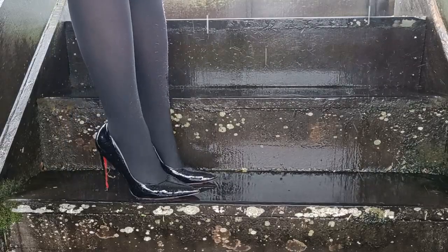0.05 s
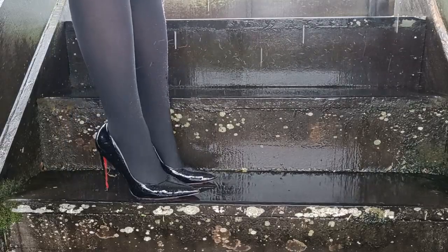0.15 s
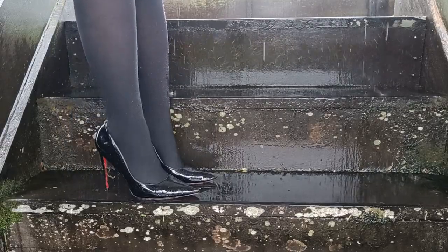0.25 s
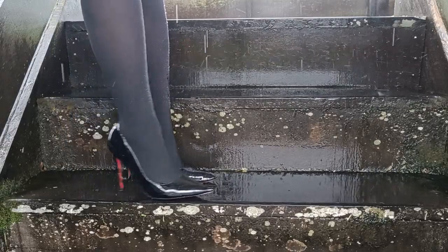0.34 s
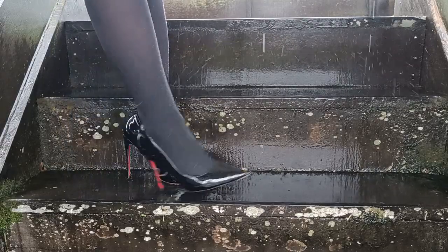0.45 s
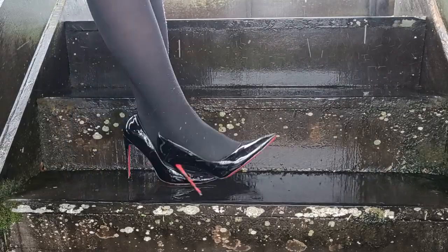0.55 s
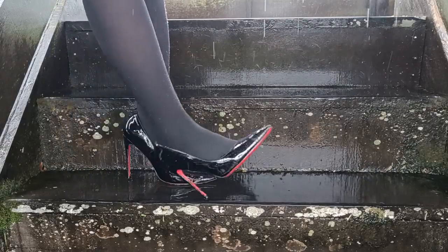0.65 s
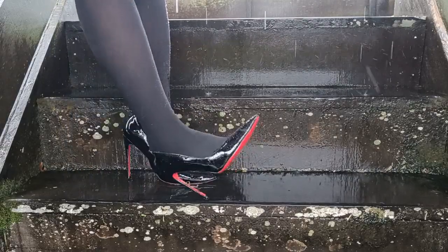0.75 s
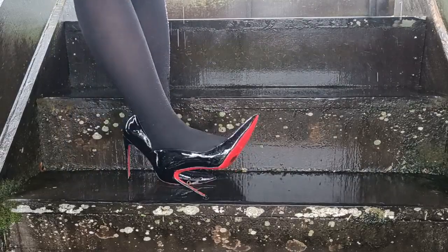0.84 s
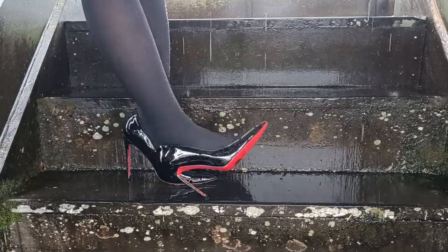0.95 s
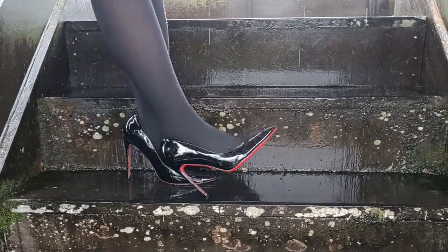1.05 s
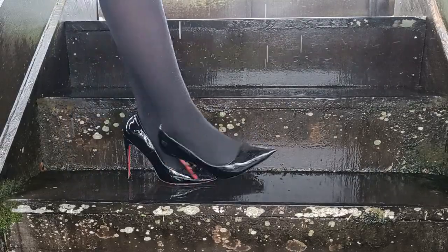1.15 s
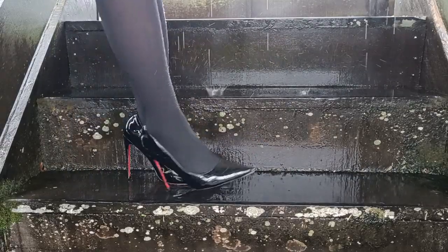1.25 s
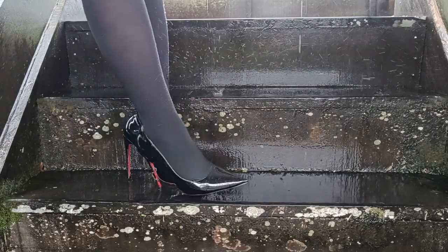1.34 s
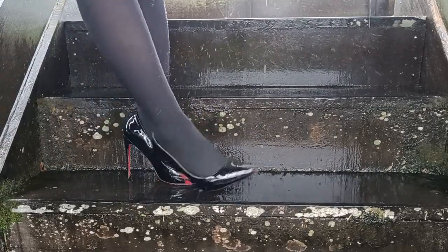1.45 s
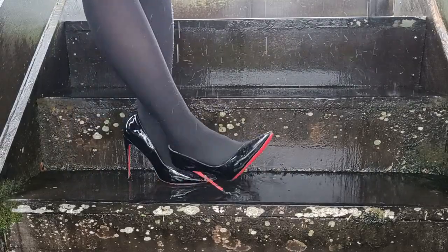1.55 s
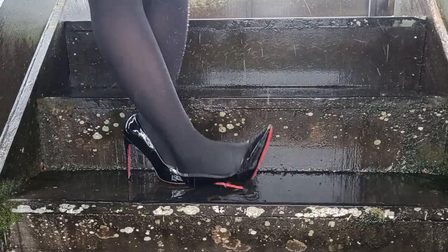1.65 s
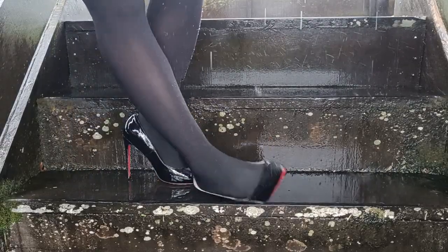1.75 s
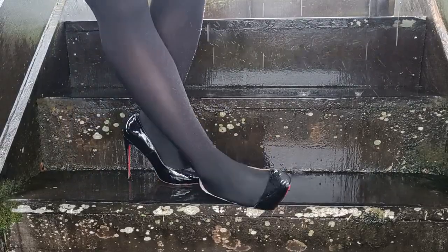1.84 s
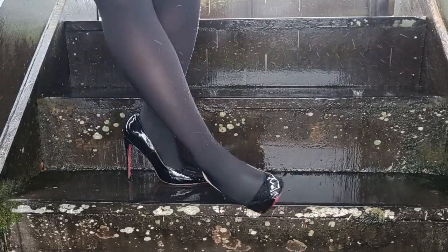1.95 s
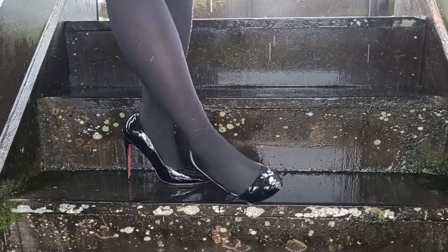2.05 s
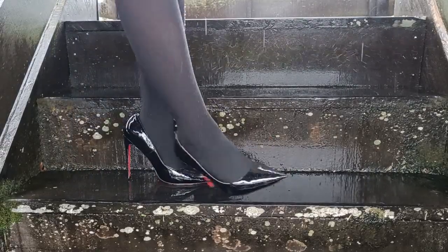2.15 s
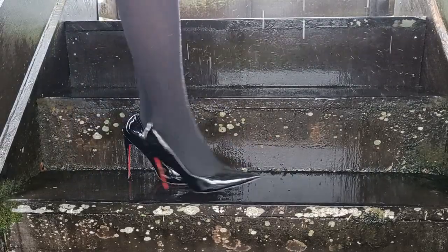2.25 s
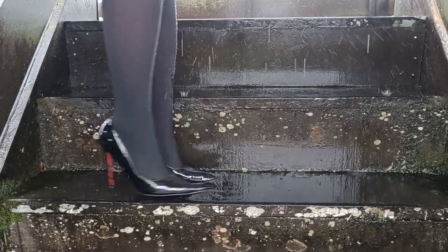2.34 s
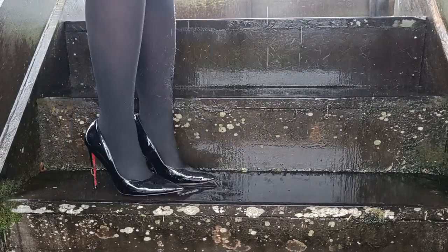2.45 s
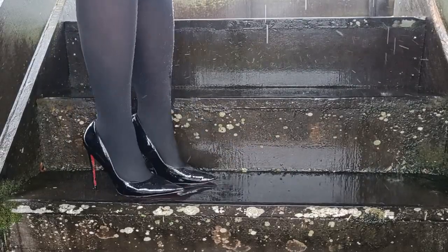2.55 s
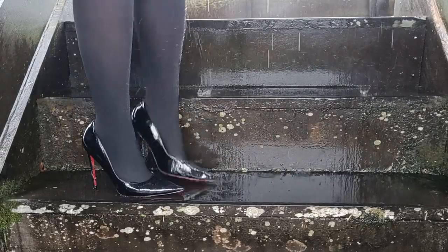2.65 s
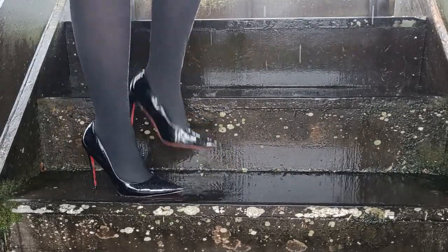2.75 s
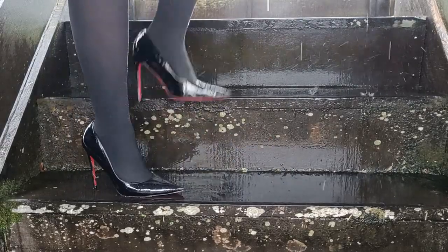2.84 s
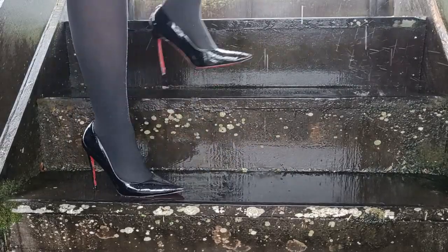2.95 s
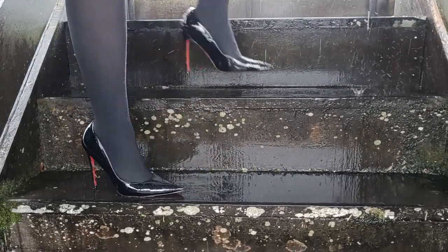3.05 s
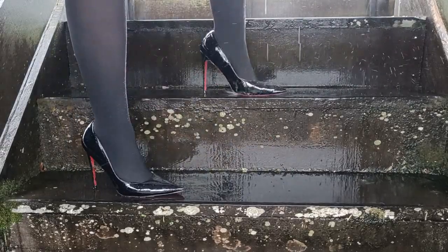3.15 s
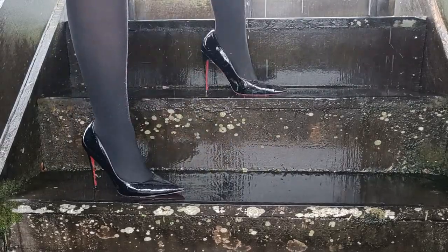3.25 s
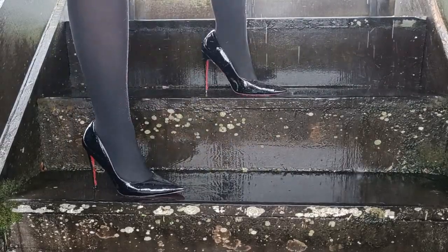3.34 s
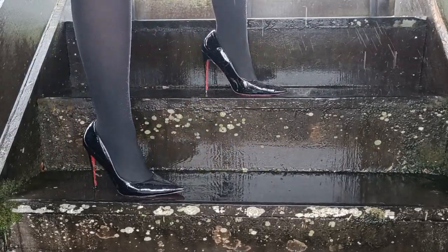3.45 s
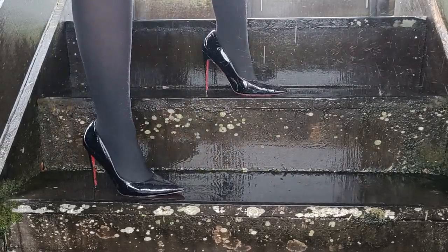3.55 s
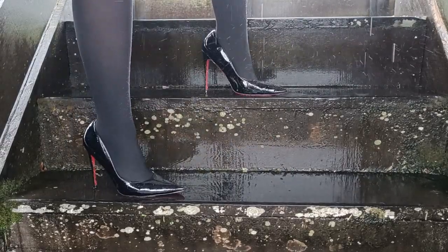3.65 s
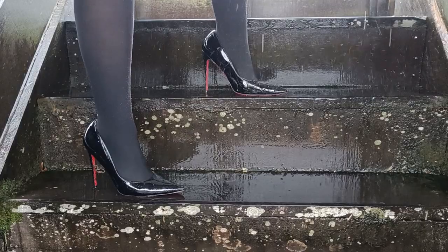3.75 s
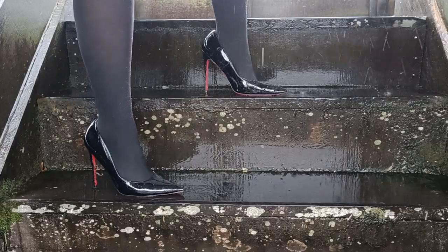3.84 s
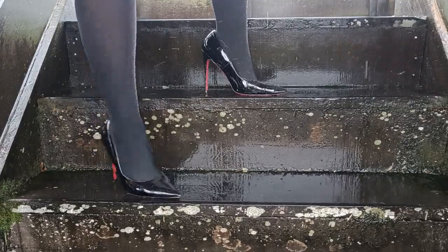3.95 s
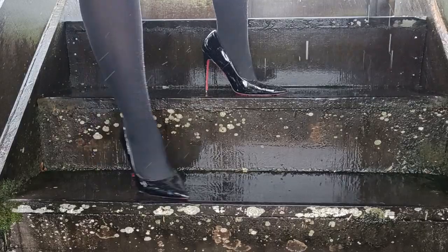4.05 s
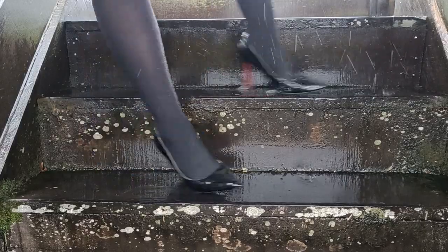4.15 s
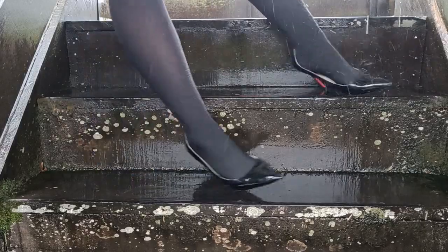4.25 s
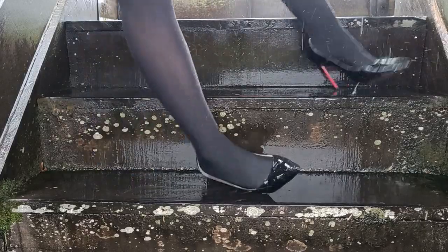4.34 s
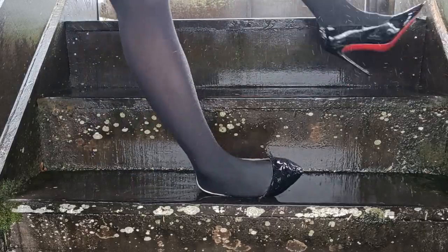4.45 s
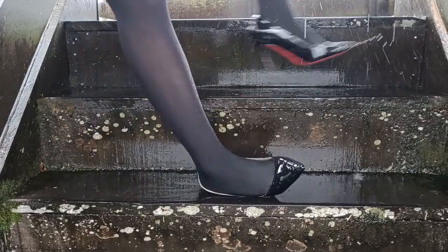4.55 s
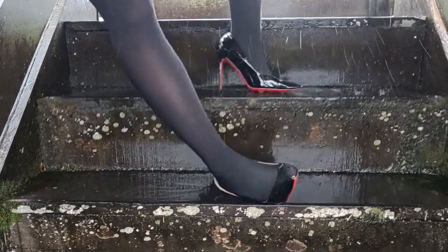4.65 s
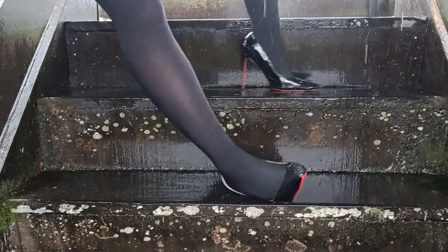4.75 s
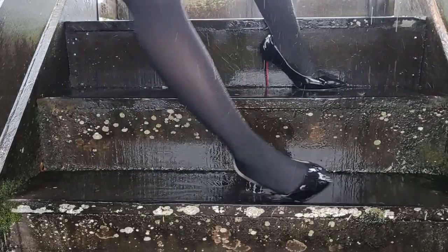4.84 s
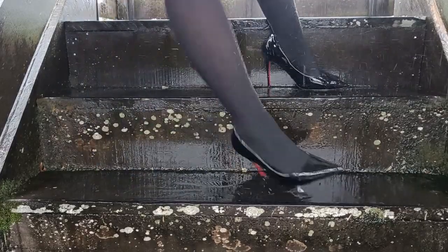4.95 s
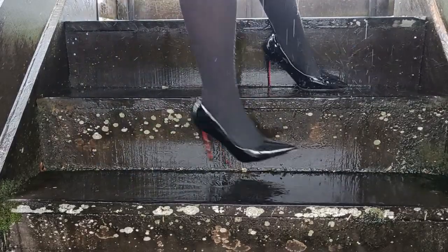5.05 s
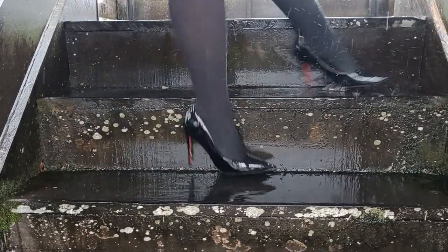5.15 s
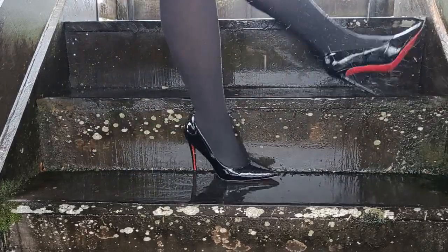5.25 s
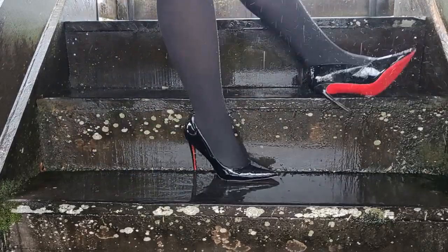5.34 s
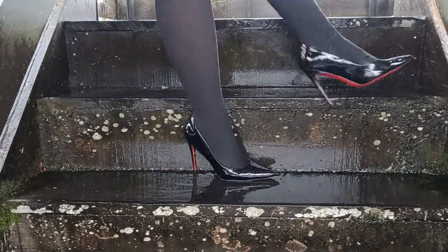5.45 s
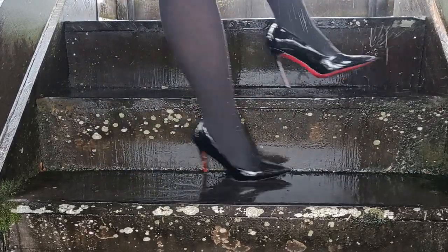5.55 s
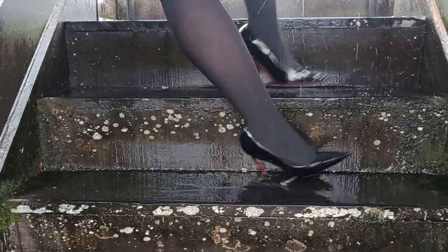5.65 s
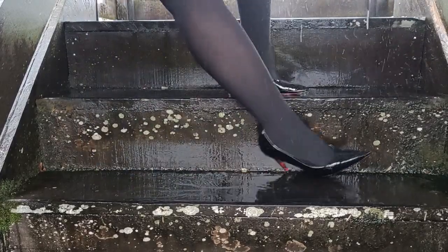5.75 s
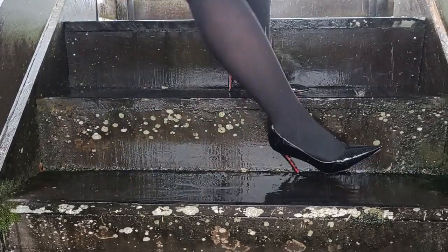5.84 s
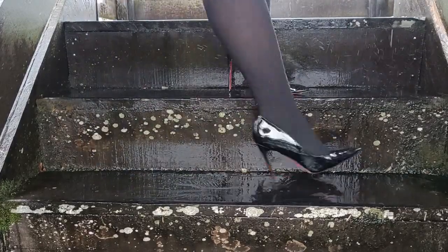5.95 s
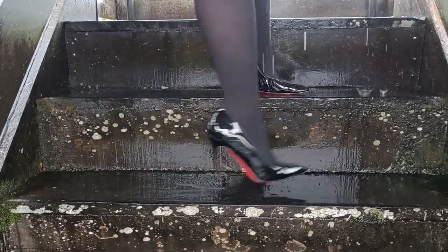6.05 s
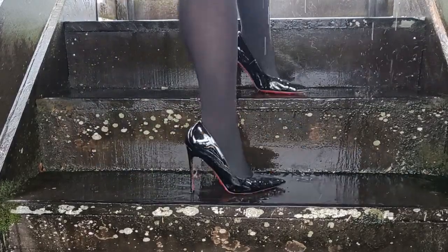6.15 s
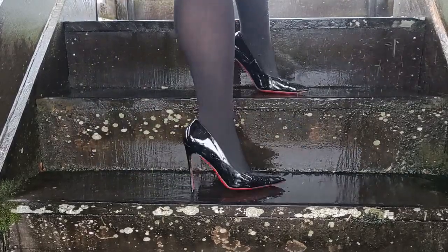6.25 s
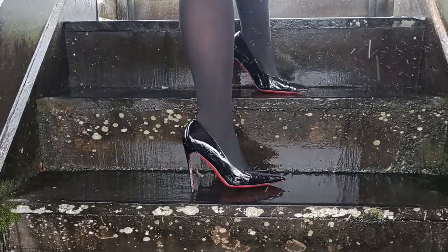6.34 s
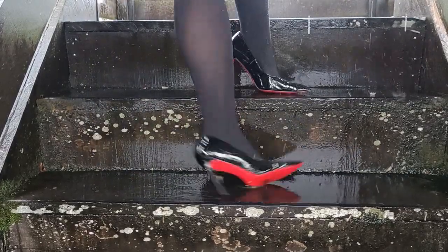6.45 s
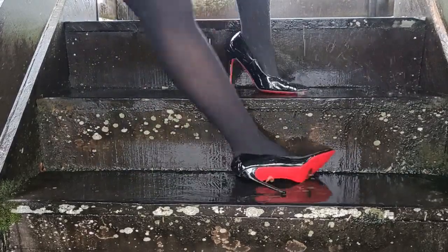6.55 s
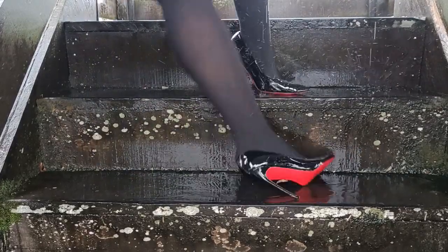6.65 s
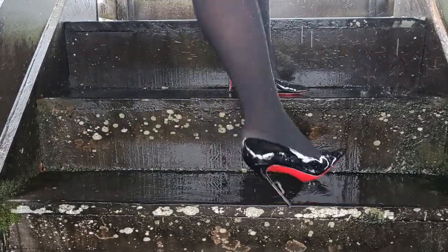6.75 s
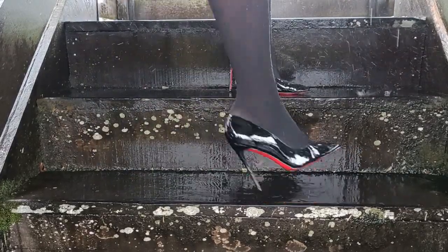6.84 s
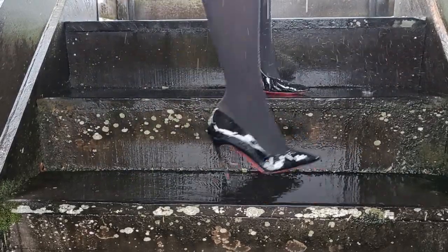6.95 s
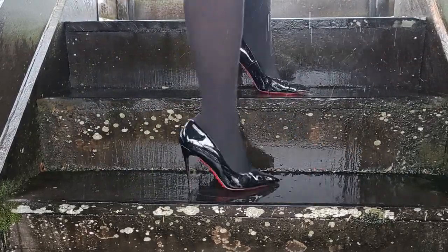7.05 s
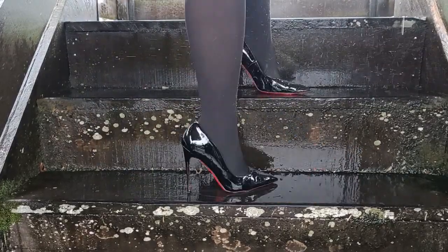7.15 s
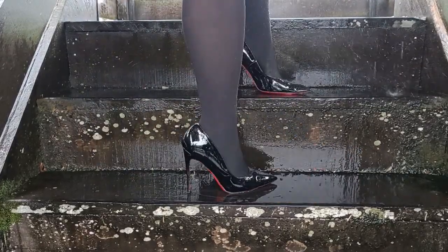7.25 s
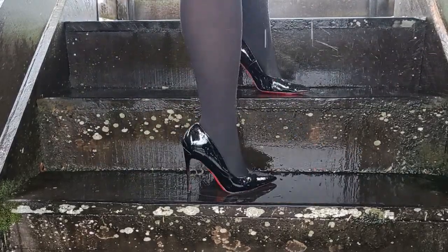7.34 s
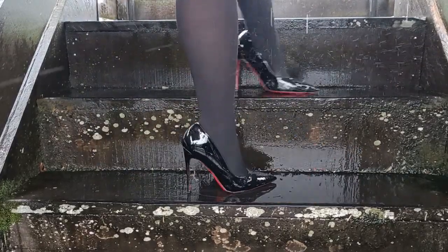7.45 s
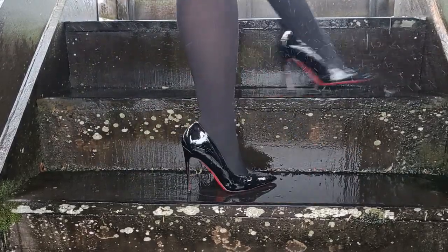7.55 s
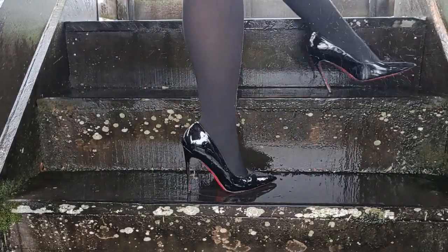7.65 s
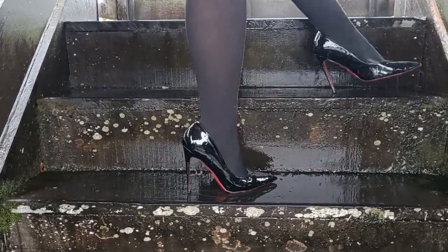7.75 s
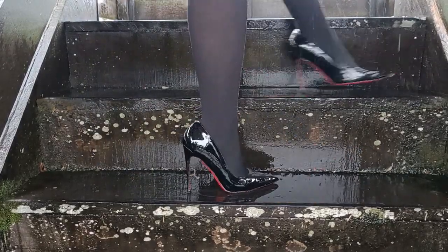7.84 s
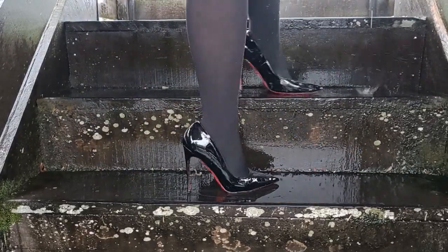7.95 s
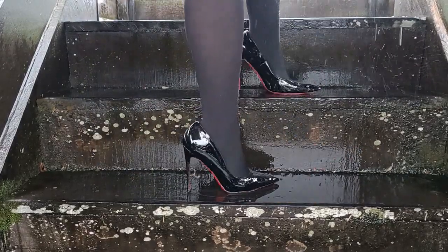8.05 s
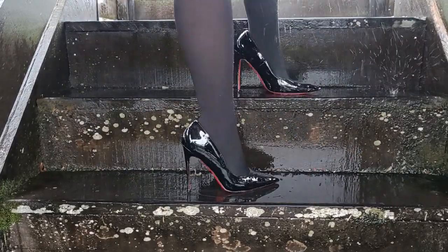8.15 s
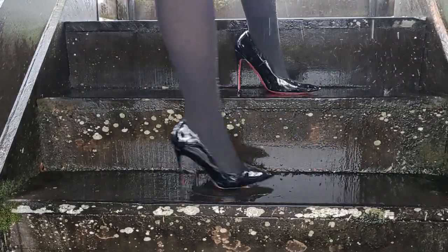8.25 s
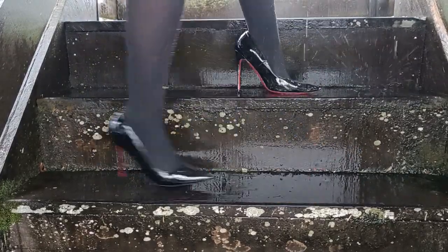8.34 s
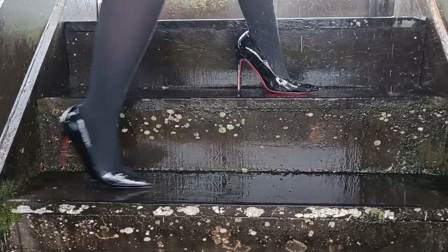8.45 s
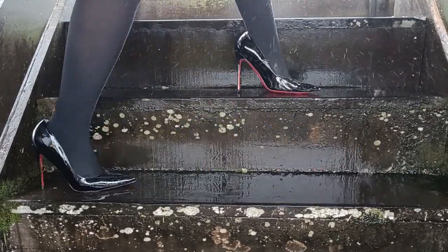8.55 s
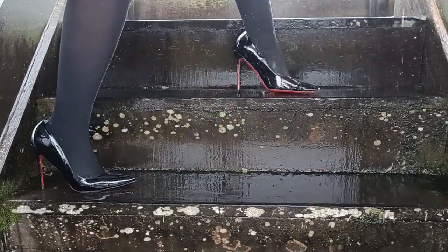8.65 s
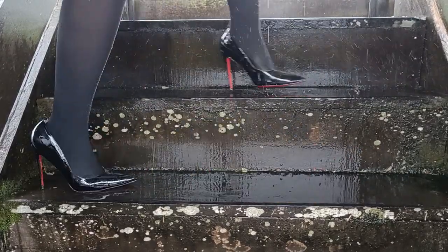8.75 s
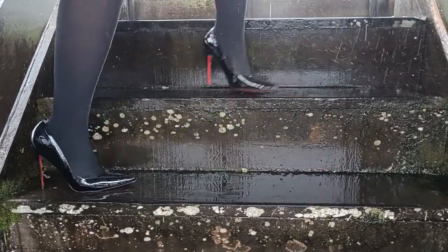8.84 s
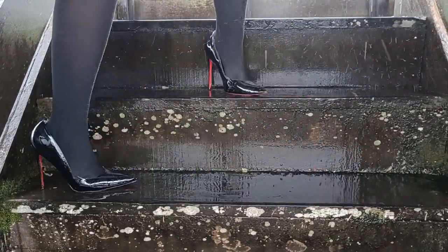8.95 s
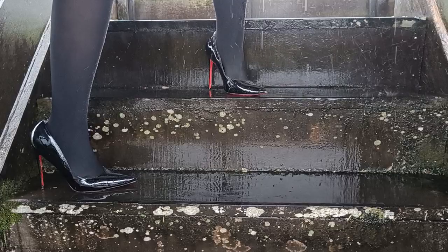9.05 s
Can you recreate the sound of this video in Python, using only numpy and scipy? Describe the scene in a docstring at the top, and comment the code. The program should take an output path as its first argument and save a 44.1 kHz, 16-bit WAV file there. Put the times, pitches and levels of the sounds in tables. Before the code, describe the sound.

Steady light rain outdoors while high heels step about on hollow wooden stairs, clacking, scuffing and slapping the wet surface.

```python
"""Stiletto heels step about on wet outdoor wooden steps in steady rain.
Each heel knocks on a step and sets the whole staircase ringing, while the sole slaps the film of water.
Between steps the shoes rock with soft bumps or scrape over grit. Far raindrops blur into a hiss
and close ones plink. The left microphone opening is muffled; the right one lets the treble in."""
import sys
import numpy as np
from scipy import signal
from scipy.fft import rfft, irfft
from scipy.io import wavfile
from scipy.ndimage import uniform_filter1d, minimum_filter1d

SR = 44100
rng = np.random.default_rng(int(sys.argv[2]) if len(sys.argv) > 2 else 0)


def inscribe(sig):
    """Save sig as 16-bit PCM at rate SR to the path in sys.argv[1].

    A 1-D sig is mono; a 2-D sig holds one channel per row.
    Samples are clipped to [-1, 1] before scaling.
    """
    pcm = np.round(np.clip(np.atleast_2d(sig).T, -1, 1) * 32767)
    wavfile.write(sys.argv[1], SR, pcm.astype(np.int16))


N = 401310
TAIL = np.arange(SR * 3 // 5) / SR  # seconds since a hit

# tone of the rain all around: f/Hz, relative level/dB
RAIN_SPECTRUM = [(25, -10.5), (100, -5.5), (260, -7), (380, -3), (480, 0), (620, -6), (1080, -6.5),
                 (1340, -2.5), (2000, -8), (2800, -17.5), (5000, -19.5), (6700, -21.5), (12000, -21.5),
                 (15500, -30.5)]
# how alike the rain is in both ears: f/Hz, likeness (1 = the same)
RAIN_LIKENESS = [(60, 0.87), (130, 0.89), (290, 0.9), (640, 0.32), (1400, 0), (16000, 0)]
# drops landing close by: t/s, level/dB, f/Hz
CLOSE_DROPS = [(.567, -31, 8650), (1.14, -30, 12500), (1.42, -11.5, 6000), (2.775, -31, 8650),
               (4.113, -25.5, 6100), (7.0, -14, 5600), (8.536, -18, 11800)]
# a standing shoe rocks and bumps the step: t/s, level/dB, brightness/dB
BUMPS = [(1.4, -53, -10), (1.548, -47.5, -6.5), (1.838, -49, -6.5), (4.41, -45.5, -4.5), (5.014, -36.5, -3),
         (5.253, -39.5, 3.5), (5.264, -48, -22.5), (5.452, -44, -1.5), (5.479, -35, -12),
         (5.677, -40.5, 0.5), (6.624, -31, 3.5), (6.828, -45, -2.5), (7.574, -46.5, -10.5),
         (7.749, -49.5, -5)]
# brighter bumps wake higher notes: brightness/dB, wood note f/Hz, clack top f/Hz
BUMP_TONES = [(-13.5, 175, 910), (-2, 201, 2000), (-1, 350, 2000)]
# the brief notes (modes) of heel and shoe: f/Hz, relative level/dB, time to fade 60 dB/s
SHOE_NOTES = [(200, -22.5, 0.06), (341, -3, 0.018), (533, 4, 0.012), (885, 0, 0.0082), (1400, -2, 0.0069),
              (2035, -1.5, 0.0068)]
# the notes of the staircase: f/Hz, relative level/dB, time to fade 60 dB/s
STAIR_NOTES = [(41.2, -13.5, 0.96), (88.2, -5, 0.64), (105.6, -7, 0.095), (122.7, -3, 0.38),
               (158.4, -16, 0.45), (173, -14.5, 0.41), (214.2, -7.5, 0.2), (302.7, -2.5, 0.23),
               (366, 2, 0.19), (396.5, -9.5, 0.23), (458.8, -1.5, 0.13), (492.6, 1.5, 0.23),
               (645, -14, 0.18), (714, -7.5, 0.33), (751, -11.5, 0.23), (1032.5, -5.5, 0.11),
               (1228, -6.5, 0.081), (2190, -23, 0.22)]
# its blur of crowded notes and nearby echoes: f/Hz, relative level/dB
RING_SPECTRUM = [(30, -18), (60, -6.5), (130, 8), (255, 1), (320, 2), (500, 7), (800, -4), (1300, -6.5),
                 (1900, -13.5), (2700, -22), (5000, -57)]
# how long that blur lasts: f/Hz, time to fade 60 dB/s
RING_FADES = [(40, 0.75), (120, 0.27), (400, 0.25), (1000, 0.27), (2500, 0.11)]
# how alike it is in both ears: f/Hz, likeness
RING_LIKENESS = [(60, 0.33), (130, 0.46), (300, 1.0), (650, 0.23), (1400, 0.07)]
# a shoe drags over the step: t/s, length/s, level/dB, squeak f/Hz
SHOE_DRAGS = [(2.528, 0.022, -40.5, 890), (4.241, 0.21, -44, 1436), (4.323, 0.048, -37.5, 930),
              (5.307, 0.11, -33.5, 1420), (5.373, .05, -28.5, 1680), (5.418, 0.05, -34.5, 1494),
              (6.589, 0.13, -32.5, 854)]
# a foot comes down: heel t/s, level/dB, brightness/dB, wood note f/Hz, clack top f/Hz,
# sole delay/s (negative = sole first), splash level/dB
FOOTSTEPS = [ (2.5662, -26, -.5, 625, 1370, -0.0065, -66), (3.321, -18.5, 5.5, 473, 1830, -0.016, -44),
             (4.7998, -15.5, 0, 112, 2830, -.0015, -24), (5.3467, -18.5, -4.5, 356, 1790, .001, -39),
             (5.864, -17, 3, 463, 2410, -0.014, -36), (6.2846, -14.5, 3.5, 1012, 2750, -0.013, -42),
             (7.1789, -26.5, -3, 171.4, 1990, .012, -44), (8.075, -35.5, -5.5, 368, 1920, -0.012, -46),
             (8.6136, -17, 9, 642, 2590, -0.0063, -46.5), (9.008, -22, 6, 472, 1990, -0.014, -39)]


def from_db(db):
    """Turn decibels into a gain."""
    return 10 ** (np.asarray(db) / 20)


def rms(x):
    """The average strength of a sound."""
    return np.sqrt(np.mean(x ** 2) + 1e-20)


def at_hz(points, hz):
    """Read between a table's rows, with octaves evenly spaced."""
    points = np.array(points)
    return np.interp(np.log(np.maximum(hz, 1)), np.log(points[:, 0]), points[:, 1])


def filtered(x, hz, kind, order=2):
    """Keep only the lows, the highs or a band."""
    return signal.sosfilt(signal.butter(order, np.minimum(hz, SR / 2 - 100), kind, fs=SR, output="sos"), x)


def resonance(x, hz, width_hz, boost_db):
    """Lift a narrow band."""
    return x + from_db(boost_db) * signal.lfilter(*signal.iirpeak(hz, hz / width_hz, fs=SR), x)


def fade(t60):
    """Die away by 60 dB in t60 seconds."""
    return np.exp(-np.log(1000) * TAIL / t60)


def add(out, s, sound):
    """Mix a sound in at s seconds."""
    at = int(s * SR)
    part = out[:, at:at + sound.shape[-1]]
    part += sound[..., :part.shape[1]]


def stereo_noise(spectrum, likeness, size):
    """Shaped noise of strength 1, partly shared by both ears."""
    hz = np.arange(size // 2 + 1) * SR / size
    alike = np.clip(at_hz(likeness, hz), -1, 1)
    mid, side = rfft(rng.standard_normal((2, size)))
    both = np.sqrt(1 + alike) * mid + np.sqrt(1 - alike) * side * [[1], [-1]]
    noise = irfft(both * from_db(at_hz(spectrum, hz)), size)
    return noise / rms(noise)


def grains(per_s, spread_db, size):
    """Random clicks of uneven size, with overall strength 1."""
    clicks = (rng.random(size) < per_s / SR) * rng.standard_normal(size)
    clicks *= from_db(spread_db * rng.standard_normal(size))
    return clicks / rms(clicks)


def rain():
    """Far drops merge into a nearly even hiss; nearer ones patter and tick."""
    knots = np.arange(0, N, SR // 8)
    waver = from_db(0.11 * np.interp(np.arange(N), knots, rng.standard_normal(len(knots))))
    hiss = from_db(-44) * waver * stereo_noise(RAIN_SPECTRUM, RAIN_LIKENESS, N)
    patter = filtered(grains(per_s=250, spread_db=-1, size=(2, N)), [1500, 9000], "band")
    ticks = filtered(grains(per_s=160, spread_db=0, size=(2, N)), [7000, 15000], "band")
    spatter = rng.standard_normal(len(TAIL)) * fade(0.0033)
    ticks = signal.fftconvolve(ticks, spatter[None])[:, :N]
    return hiss + from_db(-65.5) * patter / rms(patter) + from_db(-62.5) * ticks / rms(ticks)


def plink(hz):
    """A drop rings briefly and echoes between the steps."""
    echo = filtered(rng.standard_normal((2, len(TAIL))), [hz / 1.34, hz * 1.15], "band", order=3)
    ring = np.sin(2 * np.pi * hz * TAIL) * fade(0.0045) * (1 - np.exp(-TAIL / 0.00068))
    return ring + from_db(-23.5) * echo / rms(echo) * fade(0.1)


def drops(droplet_hz=11900, strays_per_s=2.5):
    """Close drops each throw off a tiny droplet; faint strays fall at random."""
    out = np.zeros((2, N))
    for s, db, hz in CLOSE_DROPS:
        add(out, s, from_db(db) * (plink(hz) + from_db(-5.5) * plink(droplet_hz)))
    for _ in range(int(strays_per_s * N / SR)):
        s = rng.uniform(0, N / SR)
        db = -31 + 3.5 * rng.normal()
        add(out, s, from_db(db) * plink(rng.uniform(7000, 14000)))
    return out


def struck(notes, spread_db, spread_pitch):
    """A struck object's notes fade away; their strength and pitch vary with where it is hit."""
    sound = np.zeros(len(TAIL))
    for k, (hz, db, t60) in enumerate(notes):
        strength = (-1) ** k * from_db(db + spread_db * rng.normal())
        pitch = hz * (1 + spread_pitch * rng.normal())
        sound += strength * fade(t60) * np.sin(2 * np.pi * pitch * TAIL)
    return sound


def dense_ring():
    """Countless close notes of the wood: noise in which each octave dies at its own pace."""
    size = len(TAIL)
    spectrum = rfft(stereo_noise(RING_SPECTRUM, RING_LIKENESS, size))
    hz = np.arange(spectrum.shape[1]) * SR / size
    octave = np.log2(np.maximum(hz, 1) / 20)
    bands = (irfft(spectrum * np.maximum(1 - abs(octave - k), 0), size) for k in range(10))
    return sum(band * fade(at_hz(RING_FADES, 20 * 2 ** k)) for k, band in enumerate(bands))


def early_db(x, band):
    """Level of a band over the first 60 ms."""
    return 20 * np.log10(rms(filtered(x[:, TAIL < .06], band, "band", order=3)))


def shape_tone(x, curve):
    """Filter along points (f/Hz, gain/dB), keeping the start of a hit crisp."""
    size = 2 * x.shape[-1]
    hz = np.arange(size // 2 + 1) * SR / size
    cepstrum = irfft(np.log(from_db(at_hz(curve, hz))), size)
    # minimum phase: nothing sounds before the hit
    cepstrum[1:] *= 1 + np.sign(size // 2 - np.arange(1, size))
    return irfft(rfft(x, size) * np.exp(rfft(cepstrum)), size)[..., :size // 2]


def knock(level_db, bright_db, spot_hz, top_hz, contact_db):
    """The shoe cracks on the wood and the stairs ring on; brightness tips it from thump to clack."""
    # stiffer spots ring higher and make the contact harder
    hard_db = contact_db + 6 * np.log2(spot_hz / 464)
    heel = filtered(struck(SHOE_NOTES, spread_db=1, spread_pitch=.04), 78, "high")
    heel *= from_db(hard_db + 19) * (1 - np.exp(-TAIL / 0.0015))
    wall_echo = from_db(-13) * np.interp(TAIL - 0.022, TAIL, heel, left=0)
    # the spot where the shoe lands brings out one note of the wood
    spot = from_db(9) * np.sin(2 * np.pi * spot_hz * TAIL) * fade(0.14)
    stairs = struck(STAIR_NOTES, spread_db=5, spread_pitch=0.0047) + spot + from_db(7.5) * dense_ring()
    rise_s = 0.0016 * from_db(-hard_db)  # a soft contact feeds the wood more slowly
    sound = heel + wall_echo + stairs * (1 - np.exp(-TAIL / rise_s))

    thump_db = level_db - 3.5 - bright_db
    clack_db = level_db - 5.5 + 0.45 * bright_db
    low = thump_db - early_db(sound, [30, 260])
    middle = level_db - early_db(sound, [260, 750])
    high = clack_db - early_db(sound, [750, 2600])
    # only a heavy step shakes the whole staircase
    weight_db = (level_db + thump_db) / 2
    firm_step_db = -20
    shake = -40 + 1.09 * (weight_db - firm_step_db) - early_db(sound, [30, 65])
    # a dull bump from the ball of the foot loses deep bass
    deep = low + 0.53 * min(bright_db, 0)
    curve = [(55, shake), (80, min(shake, deep) - 2.5), (110, deep), (160, low), (260, low),
             (400, middle), (700, middle), (880, high)]
    # the time the contact takes limits the highest pitches
    treble_cut = [(1.22 * top_hz, high), (1.09 * top_hz, high - 21), (3 * top_hz, high - 52)]
    return shape_tone(sound, curve + treble_cut)


def splat(splash_db):
    """The water film bursts under a sole: a snap, then fine spray and echoes."""
    burst = grains(per_s=9600, spread_db=1, size=(2, len(TAIL))) * (1 - np.exp(-TAIL / 0.004))
    splash = filtered(burst * (fade(0.0095) + from_db(-23) * fade(0.21)), [2000, 9000], "band")
    spray = filtered(burst * (fade(0.046) + from_db(-8) * fade(0.14)), [7000, 13500], "band")
    spray_db = min(splash_db + 1, -34.5)  # the film yields only so much spray
    return sum(from_db(db) * water / rms(water[1, TAIL < .012])
               for db, water in ((splash_db, splash), (spray_db, spray)))


def bumps():
    """Soft bumps as the weight shifts, each squeezing out a little water."""
    out = np.zeros((2, N))
    brightness, *pitches = np.transpose(BUMP_TONES)
    for s, level_db, bright_db in BUMPS:
        spot_hz, top_hz = (np.interp(bright_db, brightness, hz) for hz in pitches)
        bump = knock(level_db, bright_db, spot_hz, top_hz, contact_db=-0.5)
        add(out, s, bump + splat(level_db - 18))
    return out


def scuffs():
    """Grit catches and slips under a dragged shoe, which squeaks faintly; the step answers hollowly."""
    out = np.zeros((2, N))
    for s, length, db, hz in SHOE_DRAGS:
        stroke = np.hanning(int(length * SR)) ** .5
        slips = grains(per_s=1200, spread_db=8, size=(2, len(stroke)))
        grit = resonance(filtered(slips, [600, 1900], "band", order=4), hz, width_hz=52, boost_db=13)
        add(out, s, from_db(db) * stroke * grit / rms(grit))
        wood = signal.fftconvolve(filtered(dense_ring(), [110, 700], "band"), stroke * slips[:1])
        add(out, s, from_db(db - 7) * wood / rms(wood[:, :len(stroke)]))
    return out


def footsteps():
    """The heel knocks; just before or after it the sole taps the step and slaps the water."""
    out = np.zeros((2, N))
    for s, level_db, bright_db, spot_hz, top_hz, sole_delay, splash_db in FOOTSTEPS:
        add(out, s, knock(level_db, bright_db, spot_hz, top_hz, contact_db=3))
        tap_db = min(splash_db + 3, -31)
        tap = knock(tap_db, 0, spot_hz, top_hz, contact_db=-8)
        add(out, s + sole_delay, tap + splat(splash_db))
    return out


def scene():
    """Rain and shoes together, in stereo."""
    return rain() + footsteps() + bumps() + scuffs() + drops()


def muffled_port(x, hz, q, leak_db):
    """A partly blocked microphone opening rings at one pitch and passes little above it."""
    w = 2 * np.tan(np.pi * hz / SR)
    muffled = signal.lfilter(*signal.bilinear([w * w], [1, w / q, w * w], 1), x)
    return muffled + from_db(leak_db) * x


def open_port(x, notch_hz, q):
    """The clear opening lifts one treble band and cuts a deep notch above it."""
    lifted = resonance(x, 8270, width_hz=1180, boost_db=5)
    return signal.lfilter(*signal.iirnotch(notch_hz, q, fs=SR), lifted)


def limited(x, ceiling, size):
    """A limiter looks ahead and smoothly turns down peaks that pass the ceiling."""
    room = np.minimum(1, ceiling / (abs(x) + 1e-9))
    return x * uniform_filter1d(minimum_filter1d(room, size), size)


def record(dry):
    """The sound passes two unlike microphone openings, a limiter and a cut above 16 kHz."""
    left = muffled_port(dry[0], hz=1324, q=2.08, leak_db=-32.5)
    right = open_port(dry[1], notch_hz=10230, q=1.126)
    top_cut = signal.ellip(10, .1, 80, 16000, fs=SR, output="sos")
    return signal.sosfilt(top_cut, limited(np.array([left, right]), ceiling=.89, size=130))


dry = scene()
out = record(dry)
inscribe(out)
```